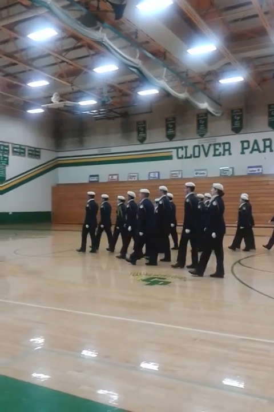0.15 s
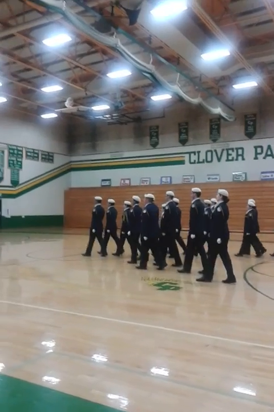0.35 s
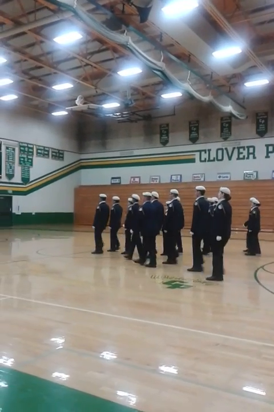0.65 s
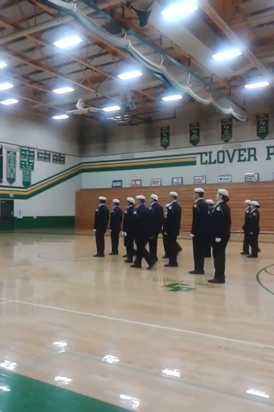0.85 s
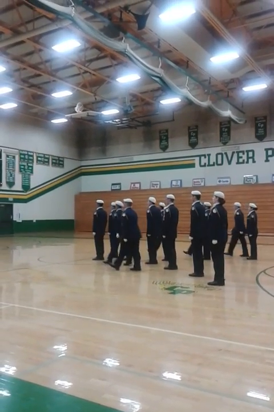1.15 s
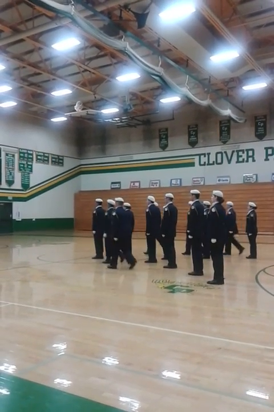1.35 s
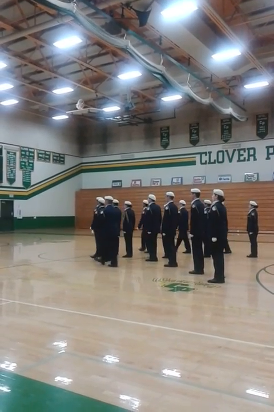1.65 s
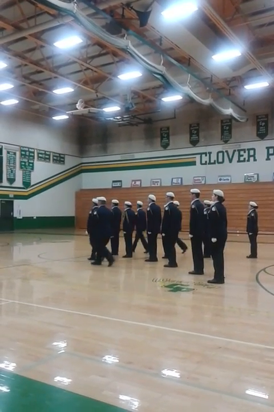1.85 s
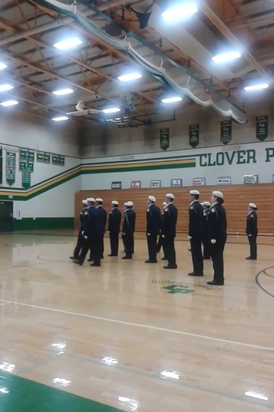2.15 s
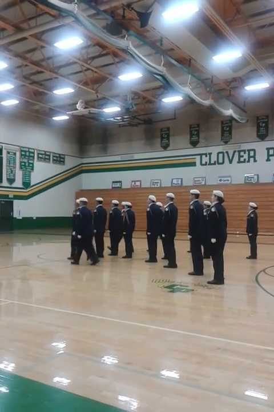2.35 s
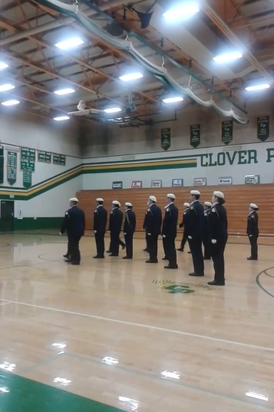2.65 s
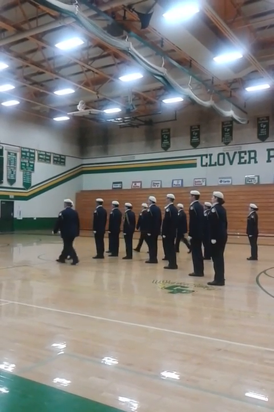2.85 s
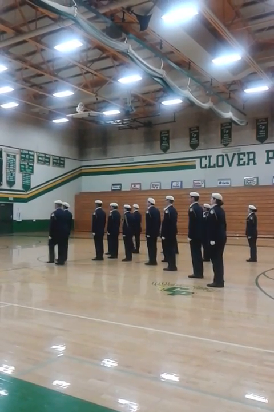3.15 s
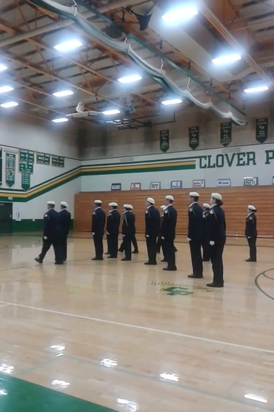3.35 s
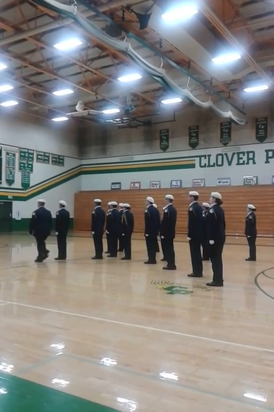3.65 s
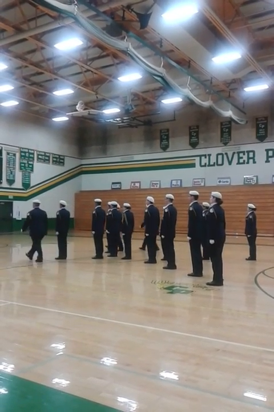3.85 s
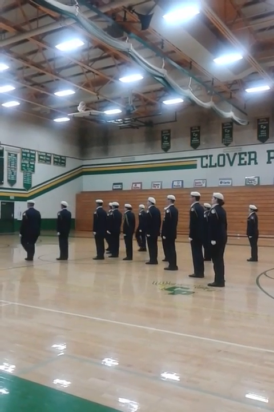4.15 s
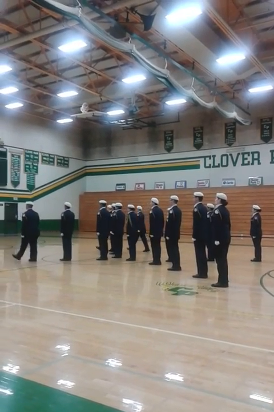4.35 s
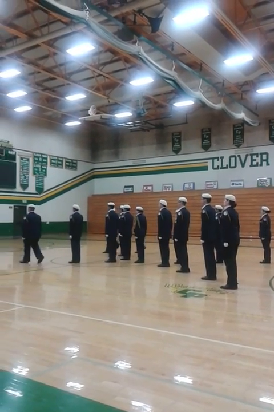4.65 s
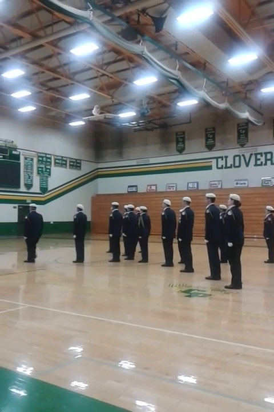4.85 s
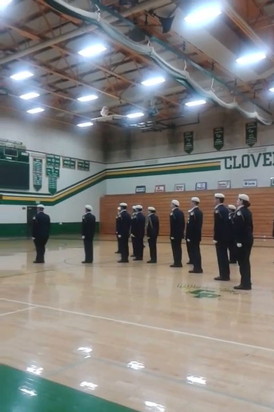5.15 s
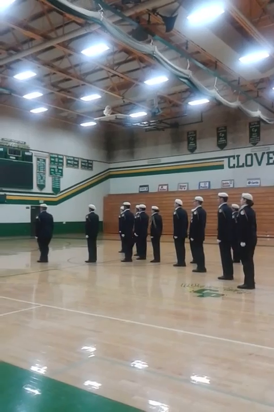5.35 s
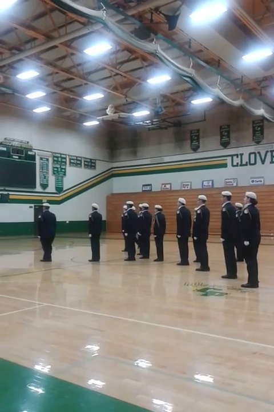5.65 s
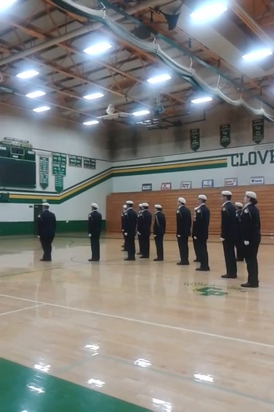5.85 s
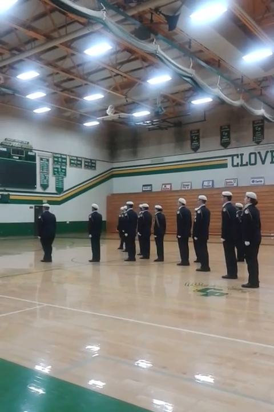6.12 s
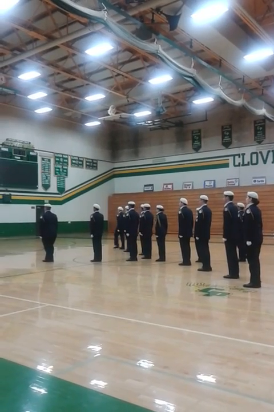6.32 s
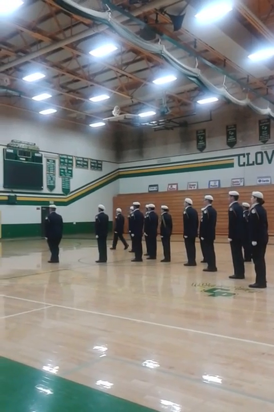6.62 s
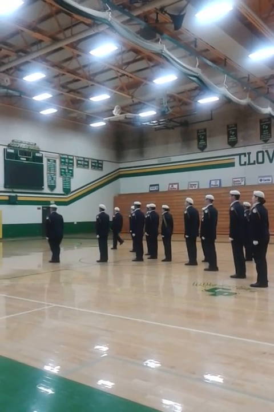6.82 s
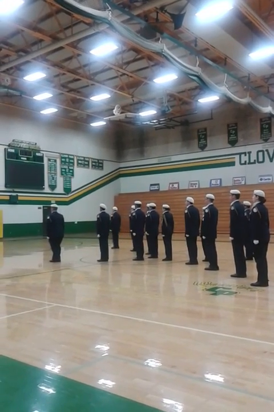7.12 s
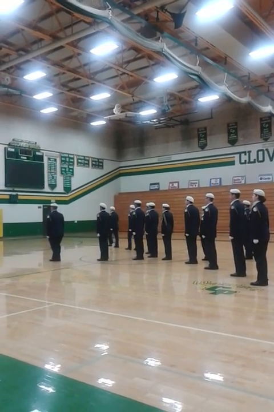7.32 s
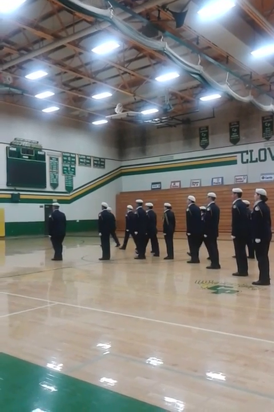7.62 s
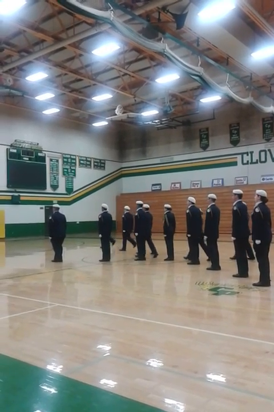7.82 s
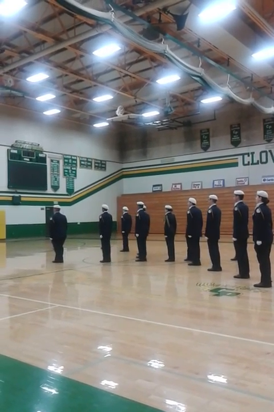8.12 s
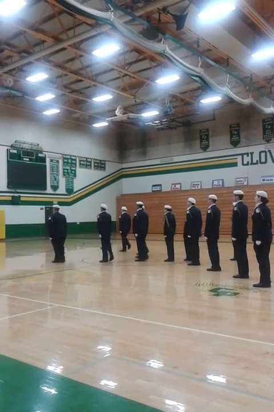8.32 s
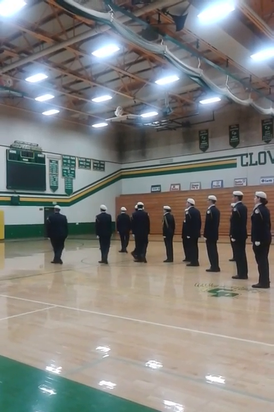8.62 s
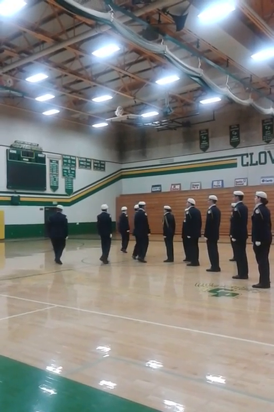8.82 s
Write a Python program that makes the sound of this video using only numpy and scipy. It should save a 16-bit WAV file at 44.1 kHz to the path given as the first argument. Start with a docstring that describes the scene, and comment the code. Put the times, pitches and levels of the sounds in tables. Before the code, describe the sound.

A drill team moves on the sprung wooden floor of a large echoing gym, heard from the sideline several metres away. Soft steps and rustling uniforms open the scene. At about 0.7 seconds many feet stamp loudly and slightly apart, with cracking heels, slapping soles and thudding boards, and the hall rings for around two seconds. Quieter marching steps continue about every half second, with very faint sole squeaks and small close handling clicks near 2 and 4 seconds. A lone stamp lands at 2.8 seconds. The group stamps loudly again at 4.9 seconds, more lightly at 7.1, and hard at 8.1 with a sharp heel clack. A few soft steps fall between these stamps. Heavier steps close the scene from about 8.6 seconds. A quiet, steady ventilation rumble with slight hiss lies underneath throughout.

```python
"""A drill team on the sprung wooden floor of a large gym, from one microphone on the sideline.
Soft steps and rustling uniforms come first; at 0.7 s a ragged stamp cracks heels, slaps soles and thuds
the boards, and the hall rings on. The march continues with faint sole squeaks, close handling clicks
and a lone stamp at 2.8 s. The ranks, 4 to 18 m away, stamp again at 4.9 s, 7.1 s and 8.1 s.
A few heavier steps close the scene, over the steady low rumble of the ventilation."""
import sys
import numpy as np
from scipy import signal
from scipy.fft import rfft, irfft
from scipy.io import wavfile
from scipy.ndimage import uniform_filter1d

SR = 44100
rng = np.random.default_rng(int(sys.argv[2]) if len(sys.argv) > 2 else 0)


def dump_mix(stems):
    """Bounce the given channels to the path in sys.argv[1] as a 16-bit WAV at rate SR."""
    frames = np.atleast_2d(stems).T  # one column per channel
    limited = np.clip(frames, -1, 1)  # hard clip at full scale
    pcm = np.round(limited * 32767).astype(np.int16)
    wavfile.write(sys.argv[1], SR, pcm)


N = 396018
HIT_T = np.arange(SR // 4) / SR  # time axis of one blow


# stamping feet out on the floor: start_s, force_db, weight_db, tilt (0 flat, 1 heel edge), distance_m
STAMPING_FEET = [ (.658, -29, 0, 0.86, 8), (.668, -7, -1, 0.92, 6.5), (.691, -4, -10.5, 0.52, 8.5),
                 (.698, -3.5, -2.5, 0.3, 7.2), (.719, -6, 1, 0.33, 8.7), (.742, -18, 11.5, 0.43, 4.6),
                 (.796, -6, -2.5, 0.28, 18), (2.826, -11, -1.5, 0.62, 11.1), (4.894, -4.5, -11, 0.27, 17.3),
                 (4.901, -6.5, 3.5, .55, 13.3), (4.928, -5.5, -7, .3, 8.5), (4.974, -11, 2, 0.29, 6.6),
                 (4.992, -14.5, 3.5, .2, 3.7), (5.010, -18.5, 7, 0.36, 3.6), (7.026, -11, -6, 0.78, 17.7),
                 (7.050, -16, -19, 0.012, 14), (7.086, -20, 3, 0.81, 8.1), (7.099, -13.5, 3, 0.21, 9.7),
                 (8.046, -1.5, -5, 0.55, 14.4), (8.077, -2, -8, 0.31, 10.7), (8.116, -5, -2, 0.37, 11),
                 (8.138, -10, 6.5, 0.53, 7.3), (8.166, -15, 4, 0.54, 7.1), (8.189, -12.5, -9, 0.35, 4.4),
                 (8.242, -13, -16, 0.61, 9.2)]
# the patch of floor under each halt: time_s, pitch_hz
FLOOR_PATCHES = [(.7, 279.4), (2.8, 237), (4.9, 316.8), (7.1, 284), (8.1, 280)]
# modes of the sprung boards, the joists below and the hard heel block: pitch_hz, level_db, t60_s
BOARD_MODES = [(172, -19.5, 0.049), (239.2, -4, 0.045), (277.3, 5, 0.04), (325.7, -12, 0.038)]
JOIST_MODES = [(128, -19, 0.26), (182.1, 3.5, 0.054), (213.6, -4.5, 0.12)]
HEEL_MODES = [(1144, -5.5, 0.048), (1895, 2, 0.012), (2800, -2, 0.0085), (3565, 1.5, 0.011),
              (8430, -3, 0.0055)]
# spectra of the sole slap, the heel crack and the boards' bending waves: frequency_hz, level_db
SLAP_SPECTRUM = [(60, -19.5), (250, -12.5), (400, 1.5), (500, -0.5), (680, 2.5), (850, 0), (1200, -8),
                 (1800, -3), (2400, -12), (3800, -23), (5500, -28), (9000, -25.5), (14000, -78.5)]
CRACK_SPECTRUM = [(200, -46.5), (1200, -5), (2300, 4.5), (2850, 3.5), (3700, 0.5), (4600, -10.5),
                  (6200, -15), (8400, -8.5), (11000, -19), (15000, -34.5)]
FORERUNNER_SPECTRUM = [(300, -24), (900, -5.5), (1600, -9.5), (2200, -2.5), (3500, -23), (7000, -45)]

def stamps(board_hz=285, hall_radius_m=6.67, joist_db=-8, heel_db=-3, cavity_db=1, forerunner_db=-16):
    """Heel cracks, sole slaps, boards and joists boom; yields start_s, sound, hall_db."""
    lead = SR // 60
    for start_s, force_db, weight_db, tilt, distance_m in STAMPING_FEET:
        _, patch_hz = min(FLOOR_PATCHES, key=lambda patch: abs(patch[0] - start_s))
        # landing on the heel edge makes the crack harder and the hollow under the sole smaller
        crack_db = -23.5 + 26.5 * tilt
        cavity_hz = 756 * (1800 / 756) ** tilt
        boards = ring(BOARD_MODES, scatter=.048, tuning=patch_hz / board_hz)
        joists = ring(JOIST_MODES, scatter=.059)
        thud = blow(boards + amp(joist_db) * joists)
        contact = burst(CRACK_SPECTRUM, decay_s=.0021)
        heel = ring(HEEL_MODES, scatter=.055, push_s=.0002)
        crack = blow(contact + amp(heel_db) * heel)
        sole = burst(SLAP_SPECTRUM, decay_s=.011, rise_s=.0007)
        trapped_air = signal.lfilter(*signal.iirpeak(cavity_hz, Q=1.8, fs=SR), sole)
        slap = blow(sole + amp(cavity_db) * trapped_air)
        foot = slap + amp(weight_db) * thud + amp(crack_db) * crack
        # distance from the microphone weakens the direct sound but not the hall
        far_db = 20 * np.log10(distance_m / hall_radius_m)
        yield start_s, amp(force_db - far_db) * foot, far_db
        # bending waves in the boards outrun the blow through the air
        swell = burst(FORERUNNER_SPECTRUM, decay_s=.002)[:lead][::-1]
        yield start_s - lead / SR, amp(force_db - far_db + forerunner_db) * swell, far_db


# marching feet between the stamps: start_s, thud_db, tap_db
MARCHING_STEPS = [ (.003, -37, -41), (.159, -35, -38), (.186, -29.5, -31), (.214, -32, -31.5),
                  (.244, -26.5, -27), (1.219, -24.5, -29), (1.706, -30.5, -46), (1.824, -25.5, -32.5),
                  (2.270, -28, -33), (2.799, -35, -47), (3.359, -24, -31.5), (3.905, -29, -36.5),
                  (3.923, -33.5, -36), (4.442, -34, -40), (5.99, -39.5, -56), (6.537, -36.5, -38.5),
                  (6.61, -34, -52), (7.684, -29, -37), (7.768, -22, -34.5), (8.599, -12.5, -22.5),
                  (8.656, -22.5, -22), (8.92, -24, -45)]
# the dull tap of a rolled heel: frequency_hz, level_db
TAP_SPECTRUM = [(100, -11), (330, 10), (700, 3.5), (1400, -4), (2000, -4.5), (2800, -20.5), (5500, -30),
                (9000, -41), (14000, -40.5)]

def steps(roll_s=.07, hall_db=2):
    """A rolled step rings only the boards: a light tap of the heel, then the softer forefoot."""
    for start_s, thud_db, tap_db in MARCHING_STEPS:
        lag_s = roll_s * np.exp(.16 * rng.standard_normal())
        heel = (start_s, thud_db, tap_db)
        forefoot = (start_s + lag_s, thud_db - 4.5, tap_db - 6)
        for contact_s, low_db, high_db in (heel, forefoot):
            thud = ring(BOARD_MODES, scatter=.03, push_s=.005)
            tap = burst(TAP_SPECTRUM, decay_s=.0063, rise_s=.00092)
            yield contact_s, amp(low_db) * thud + amp(high_db) * tap, hall_db


# pivoting soles: start_s, length_s, pitch_hz, level_db
SOLE_SQUEAKS = [(0.042, 0.12, 3720, -60), (1.62, 0.033, 3900, -59), (1.987, 0.029, 3926, -57.5),
                (3.688, 0.037, 3850, -66.5), (3.805, 0.04, 3820, -59.5), (4.339, 0.044, 4340, -64.5),
                (4.578, 0.044, 3940, -60)]

def squeaks(bend=.08, waver=.075, hall_db=-2):
    """Rubber sticks and slips on varnish: an unsteady whistle that arches and sags in pitch."""
    for start_s, length_s, pitch_hz, level_db in SOLE_SQUEAKS:
        progress = np.linspace(0, 1, int(length_s * SR))
        wobble = unit(uniform_filter1d(rng.standard_normal(len(HIT_T)), size=40))[:len(progress)]
        glide_hz = pitch_hz * (1 + bend * progress * (1 - 2 * progress) + waver * wobble)
        whistle = np.sin(2 * np.pi * np.cumsum(glide_hz) / SR)
        yield start_s, amp(level_db) * unit(np.sin(np.pi * progress) * whistle), hall_db


# small close handling clicks, and one loud heel clack in the last stamp:
# start_s, level_db, centre_hz, treble_db, decay_s, hall_db
CLICKS_AND_CLACK = [(2.043, -36.5, 1120, -39.5, 0.0075, -17), (2.111, -38, 1090, -45, 0.0051, -24),
                    (2.250, -33.5, 1210, -23.5, 0.0062, -13), (3.982, -29, 890, -29, 0.0065, -16),
                    (4.226, -38, 3720, -33, 0.003, -2.5), (8.166, -10, 2830, -38, 0.0055, -3)]

def clicks():
    """Dry knocks, each with one broad resonance."""
    for start_s, level_db, hz, treble_db, decay_s, hall_db in CLICKS_AND_CLACK:
        spectrum = [(hz / 4, -14), (hz, 0), (1.27 * hz, -9), (10000, treble_db), (15000, -45)]
        yield start_s, amp(level_db) * burst(spectrum, decay_s), hall_db


# uniforms heard from the sideline, quieter as the ranks come to rest: time_s, level_db
RUSTLE_LEVELS = [(0, -47.5), (.5, -48), (2, -54), (3.2, -57.5), (3.9, -57.5), (4.3, -51), (4.9, -59),
                 (6.9, -62.5), (7.8, -55.5), (8.98, -55)]
# rubbing cloth: frequency_hz, level_db
CLOTH_SPECTRUM = [(300, 5.5), (1000, 7.5), (2000, 4), (3800, -2), (5800, -14.5), (8500, -7.5),
                  (12000, -18.5), (15000, -21)]

def rustle(flutter_db=2, swish_db=-4.5, attack_s=.01, release_s=.071):
    """Cloth rubs in quick uneven strokes, and a trouser leg swishes with every marching step."""
    t = np.arange(N) / SR
    strokes = np.interp(t, np.linspace(0, t[-1], 600), rng.standard_normal(600))
    fades = [np.maximum((s - t) / attack_s, (t - s) / release_s) for s, _, _ in MARCHING_STEPS]
    swish = np.exp(-np.min(fades, axis=0))
    level_db = np.interp(t, *np.transpose(RUSTLE_LEVELS)) + flutter_db * strokes
    cloth = unit(colour(rng.standard_normal(N), CLOTH_SPECTRUM))
    return cloth * amp(level_db) * (1 + amp(swish_db) * swish)


# how long the gym rings: frequency_hz, t60_s
HALL_DECAY = [(60, 4.4), (130, 2.88), (280, 1.42), (800, 1.84), (1800, 1.63), (3600, 1.55), (5500, 1.29),
              (8000, 0.29), (14000, 0.06)]
# colour of its reverberation: frequency_hz, level_db
HALL_SPECTRUM = [(60, -3), (280, 0), (900, -4), (2500, -2.5), (5000, 1.5), (9000, 4.5), (11000, 4.5),
                 (14000, -30)]
# echoes from roof and walls: delay_s, level_db
HALL_ECHOES = [(.032, -10.5), (0.053, -22.5), (0.073, -18.5), (0.112, -17)]

def hall_response(gap_s=.0061, build_s=.013, grain=.84, grain_s=.11):
    """The gym from one spot: smeared echoes, and a tail that thickens and loses its treble first."""
    size = 5 * SR // 2
    t = np.arange(size) / SR
    bins_hz = np.arange(size // 2 + 1) * SR / size
    # early reflections are sparse and uneven, late ones merge
    spread = grain * np.exp(-t / grain_s)
    reflections = rng.standard_normal(size) * np.exp(spread * rng.standard_normal(size) - spread ** 2)
    spectrum = rfft(reflections)
    centres_hz = np.geomspace(50, 15000, 14)
    tail = 0
    for hz, share in zip(centres_hz, np.eye(len(centres_hz))):
        band = irfft(spectrum * along(np.c_[centres_hz, share], bins_hz), size)
        tail += band * amp(along(HALL_SPECTRUM, hz) - 60 * t / along(HALL_DECAY, hz))
    tail *= (1 - np.exp(-np.maximum(t - gap_s, 0) / build_s)) * np.sqrt(12 / SR)
    for delay_s, level_db in HALL_ECHOES:
        # trusses and bleachers scatter each echo over a few milliseconds
        smear = rng.standard_normal(len(HIT_T)) * np.exp(-HIT_T / .0043)
        add(tail, delay_s, amp(level_db) * smear / np.linalg.norm(smear))
    return tail


# the gym's background at the microphone: frequency_hz, level_db
ROOM_TONE_SPECTRUM = [(25, 7.5), (50, 8), (80, 3), (145, -3), (275, -5), (500, -9), (1160, -21.5),
                      (2600, -23.5), (3700, -27.5), (4700, -26), (6200, -30), (8100, -26), (14500, -32.5)]

def room_tone(level_db=-50):
    """Steady ventilation rumble and microphone hiss."""
    return amp(level_db) * unit(colour(rng.standard_normal(N), ROOM_TONE_SPECTRUM))


def ring(modes, scatter, tuning=1, radiate_hz=150, push_s=.0038):
    """Damped modes, tuned a little differently for each blow; the deepest bass radiates poorly."""
    swing = 0
    for pitch_hz, level_db, t60_s in modes:
        hz = pitch_hz * tuning * np.exp(scatter * rng.standard_normal())
        swing += amp(level_db - 60 * HIT_T / t60_s) * np.sin(2 * np.pi * hz * HIT_T)
    # the push builds slowly for the weight of a leg, quickly for a hard heel
    swing *= 1 - np.exp(-HIT_T / push_s)
    return blow(signal.sosfilt(signal.butter(2, radiate_hz, "high", fs=SR, output="sos"), swing))


def burst(spectrum, decay_s, rise_s=.00029, evenness=.75):
    """A contact: a dense rattle of tiny impacts that dies quickly and has little pitch of its own."""
    envelope = np.exp(-HIT_T / decay_s) * (1 - np.exp(-HIT_T / rise_s))
    rattle = rng.standard_normal(len(HIT_T)) * envelope
    # flatten chance peaks so that the given spectrum sets the tone
    power = uniform_filter1d(np.abs(rfft(rattle)) ** 2, size=21)[1:]
    hz = np.arange(1, len(power) + 1) * SR / len(rattle)
    even = colour(rattle, np.c_[hz, -10 * evenness * np.log10(power)])
    return blow(colour(even, spectrum))


def colour(x, spectrum, size=2048):
    """Minimum-phase filter through frequency_hz, level_db points."""
    gain = amp(along(spectrum, np.arange(size // 2 + 1) * SR / size))
    cepstrum = irfft(np.log(gain))
    cepstrum[1:size // 2] *= 2
    cepstrum[size // 2 + 1:] = 0
    impulse = irfft(np.exp(rfft(cepstrum)))
    return signal.fftconvolve(x, impulse)[:len(x)]


def along(points, hz):
    """Read frequency_hz, value points on a log-frequency axis."""
    points_hz, values = np.transpose(points)
    return np.interp(np.log(np.maximum(hz, 1)), np.log(points_hz), values)


def amp(db):
    """Decibels to gain."""
    return 10 ** (np.asarray(db) / 20)


def unit(x):
    """Scale to rms 1."""
    return x / np.sqrt(np.mean(x ** 2))


def blow(x):
    """Scale a hit to the energy of 5 ms at full level."""
    return x * np.sqrt(.005 * SR / np.sum(x ** 2))


def add(track, start_s, x):
    """Mix x into the track at start_s."""
    i = int(np.clip(start_s * SR, 0, N - 1))
    track[i:i + len(x)] += x[:N - i]


def scene(spots=7):
    """Each foot and click reaches the microphone directly and by one of a few paths through the hall."""
    responses = [hall_response() for _ in range(spots)]
    direct, sends = np.zeros(N), np.zeros((spots, N))
    for k, (start_s, sound, hall_db) in enumerate([*stamps(), *steps(), *squeaks(), *clicks()]):
        add(direct, start_s, sound)
        add(sends[k % spots], start_s, amp(hall_db) * sound)
    hall = sum(signal.fftconvolve(send, response)[:N] for send, response in zip(sends, responses))
    return (direct + hall + rustle() + room_tone())[None]


def record(dry, low_hz=95, top_hz=14900, knee=9):
    """The phone thins the bass, rounds off the loudest peaks and cuts the top."""
    thinned = signal.sosfilt(signal.butter(2, low_hz, "high", fs=SR, output="sos"), dry)
    rounded = thinned / (1 + np.abs(thinned) ** knee) ** (1 / knee)
    return signal.sosfilt(signal.ellip(8, .2, 70, top_hz, fs=SR, output="sos"), rounded)


dry = scene()
out = record(dry)
dump_mix(out)
```